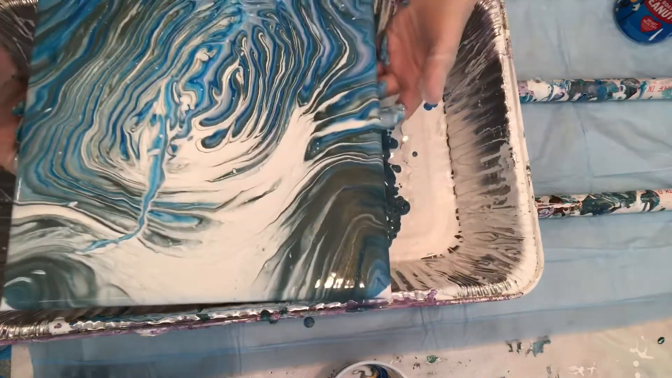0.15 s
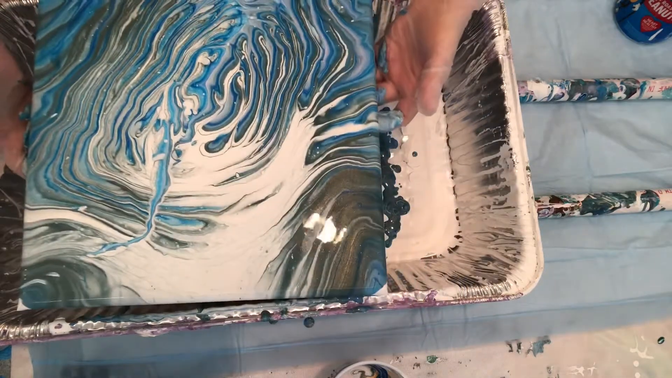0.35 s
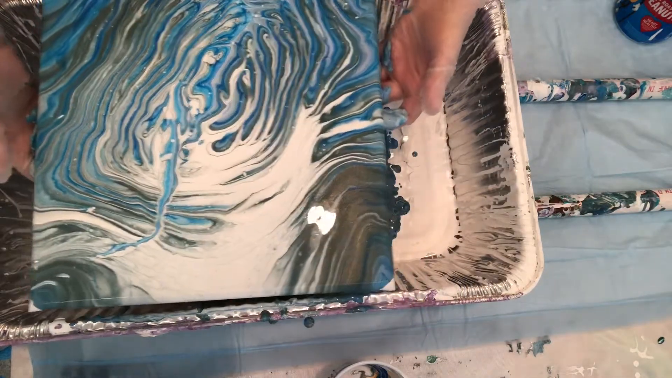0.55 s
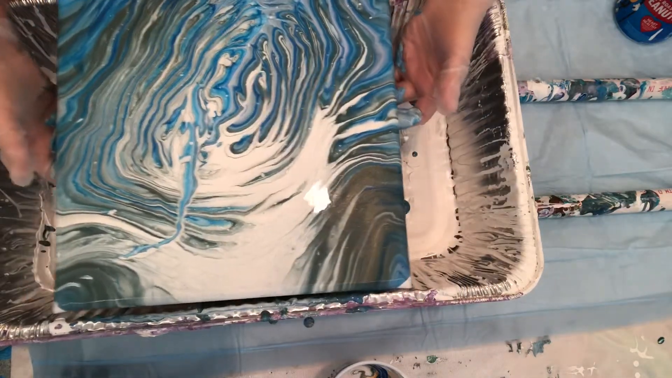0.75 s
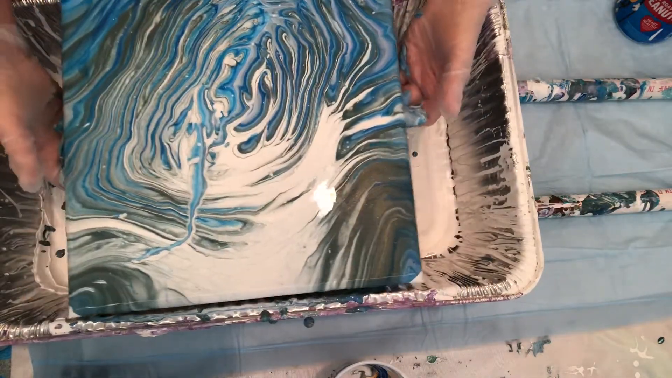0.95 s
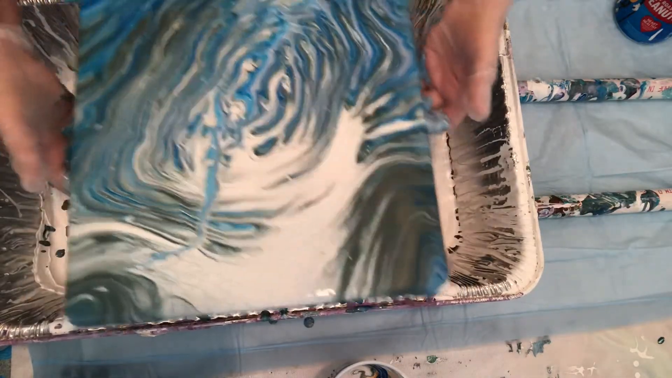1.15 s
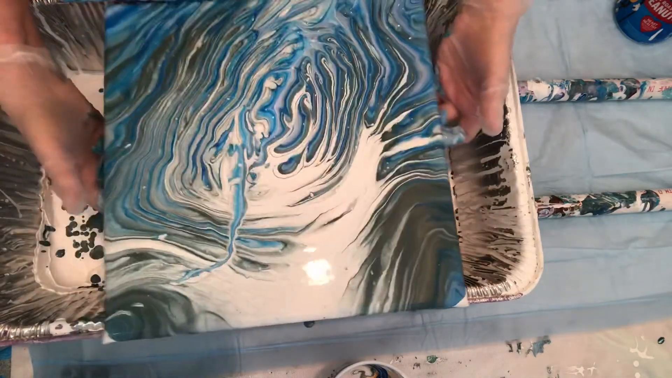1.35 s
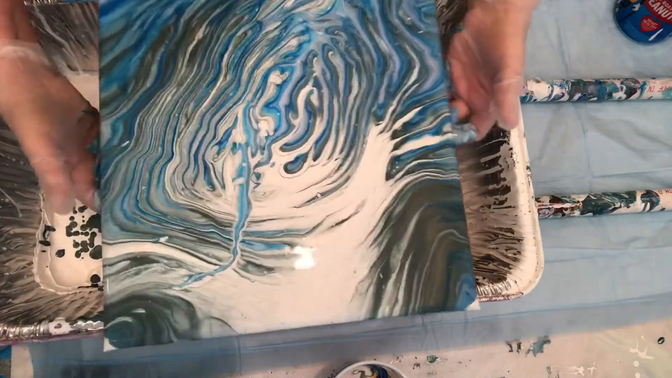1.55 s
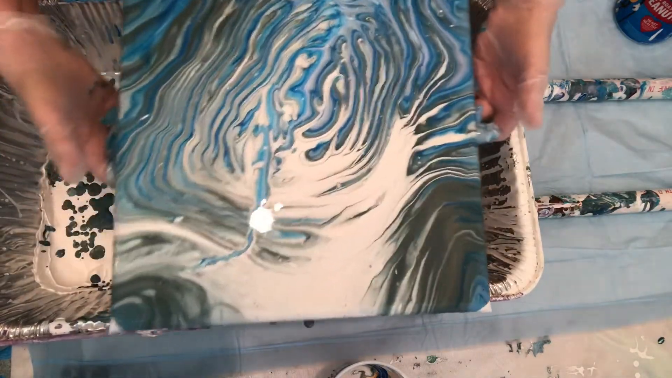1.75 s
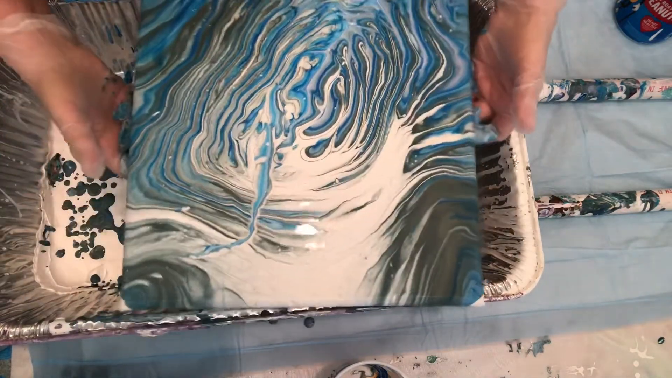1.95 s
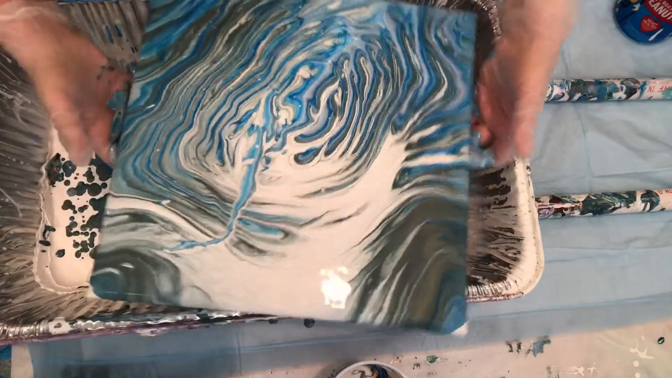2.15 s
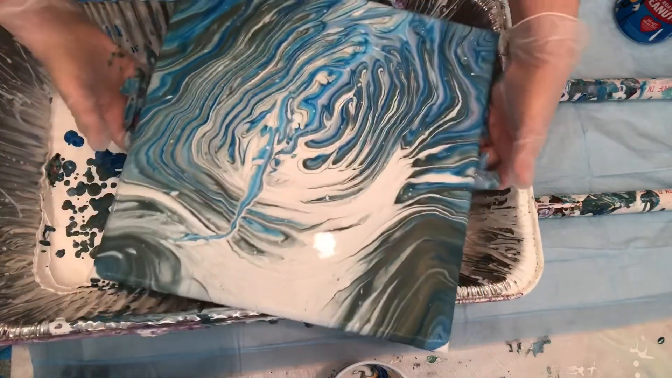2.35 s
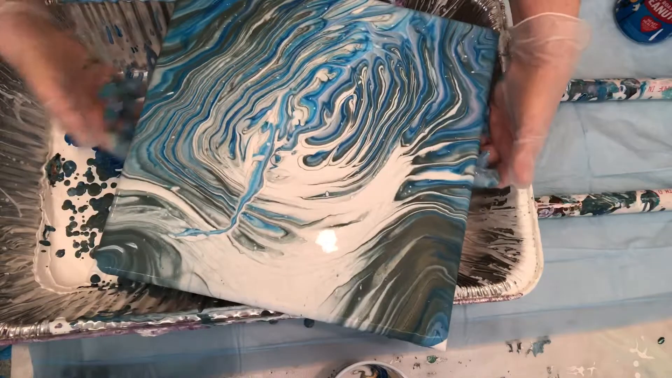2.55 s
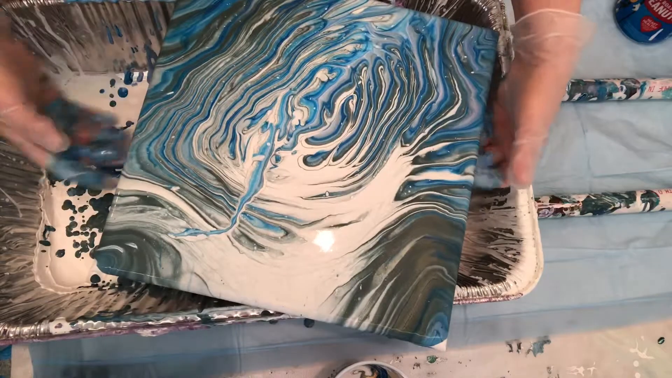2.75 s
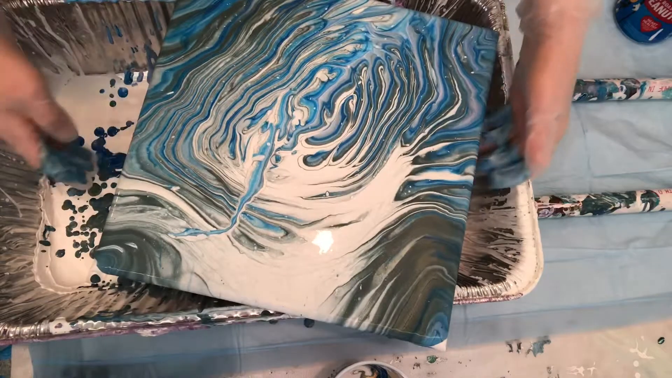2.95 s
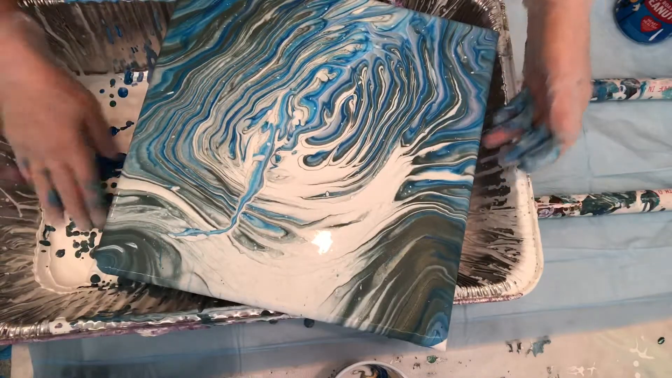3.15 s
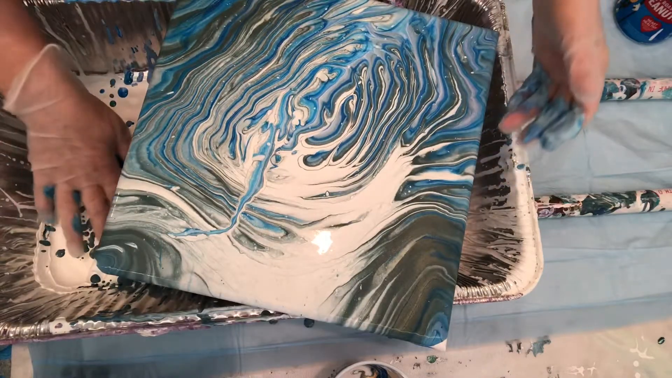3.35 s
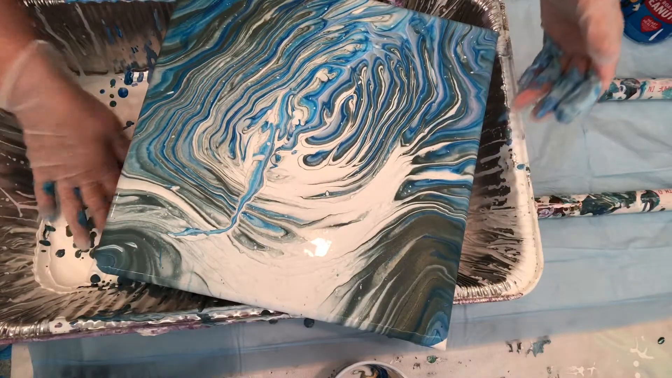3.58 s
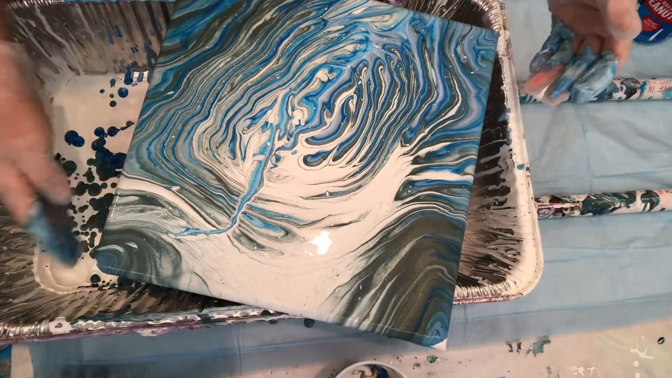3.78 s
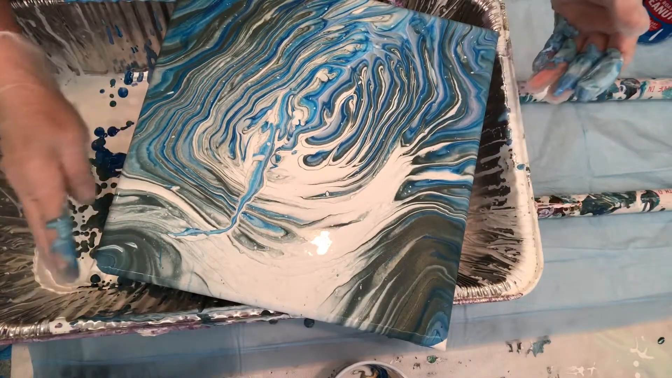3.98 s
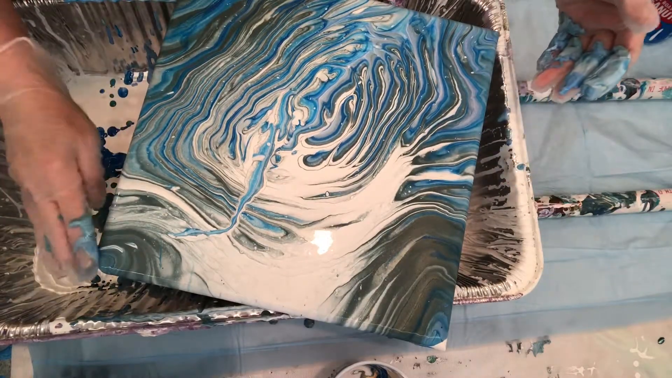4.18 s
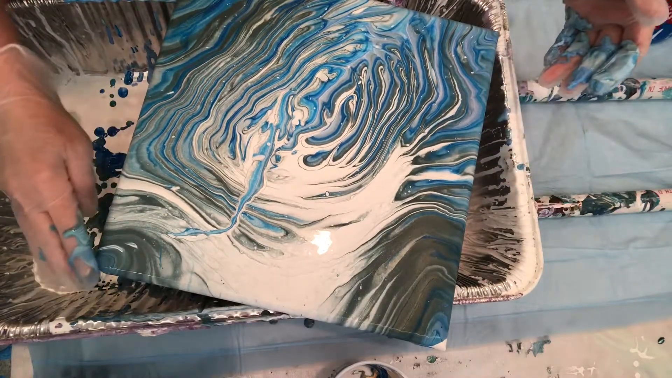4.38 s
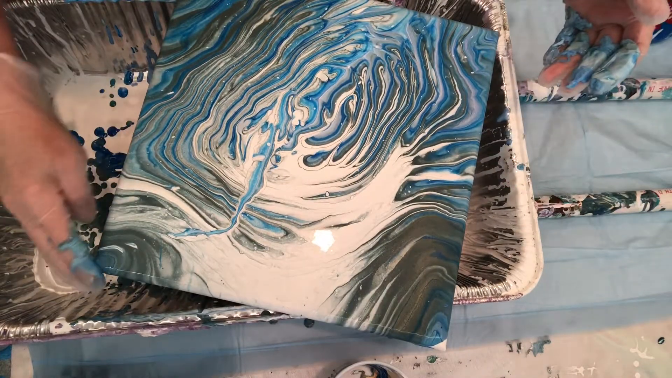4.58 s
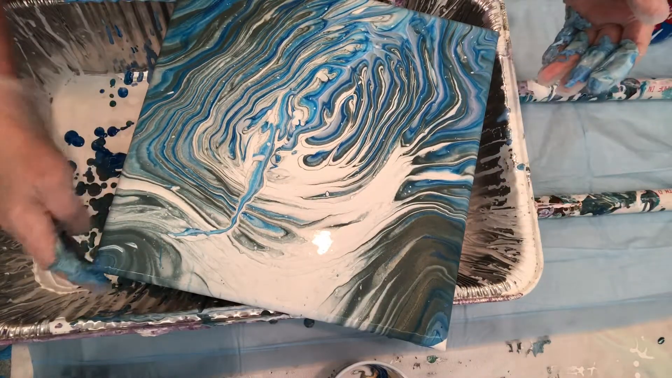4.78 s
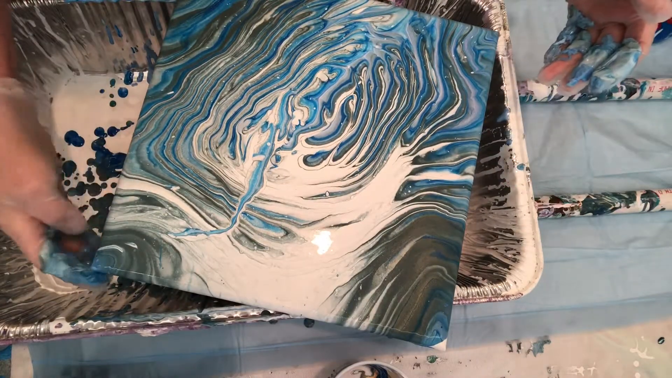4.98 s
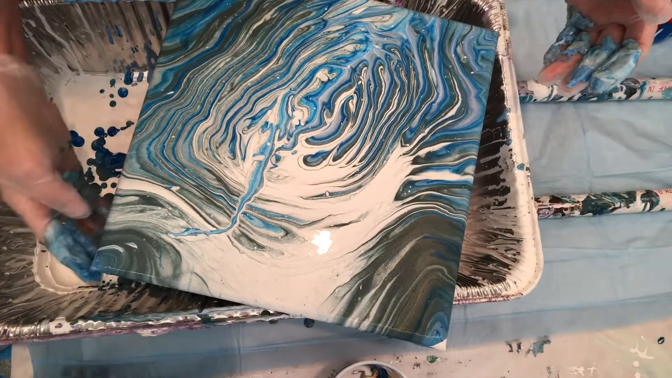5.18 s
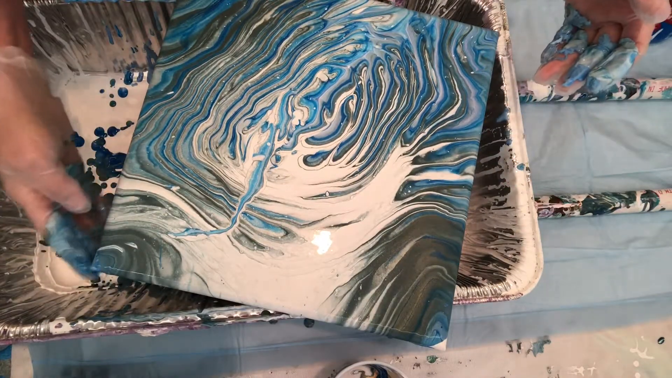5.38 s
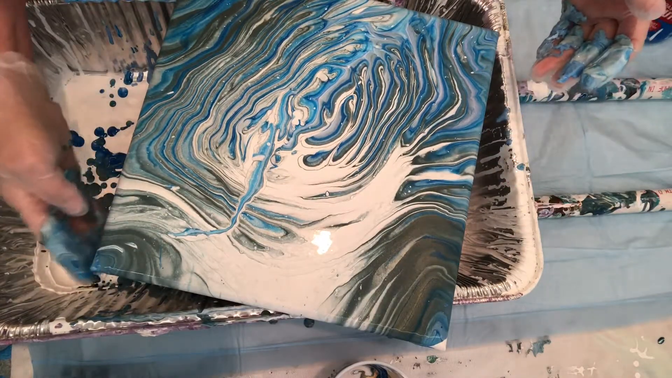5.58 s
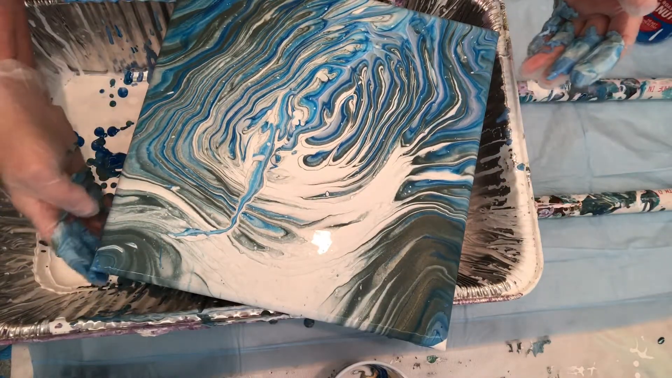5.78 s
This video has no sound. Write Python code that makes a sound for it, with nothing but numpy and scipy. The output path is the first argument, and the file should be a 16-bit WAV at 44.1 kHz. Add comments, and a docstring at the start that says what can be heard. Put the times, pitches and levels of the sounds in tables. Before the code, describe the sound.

A wooden-framed canvas bumps, drags and settles on a crackling foil tray, then gloves softly slide off and dab its edge.

```python
"""Over faint room tone, a wet stretched canvas knocks and drags on a foil tray as gloved hands tilt it.
Each landing clatters the tray, drums the cloth and thumps the wooden frame; the foil snaps under the load.
The canvas is set down and the tray's rim creaks in stick-slip steps. The gloves slide off, squeaking,
and a finger dabs along the wet edge. The small room adds a short tail."""
import sys
import numpy as np
from scipy import signal
from scipy.io import wavfile
from scipy.ndimage import uniform_filter1d

SR = 44100
rng = np.random.default_rng(int(sys.argv[2]) if len(sys.argv) > 2 else 0)


def unload_audio(sound):
    """Save the sound as a 16-bit wav file, at the path given as the first command line argument."""
    columns = np.transpose(np.atleast_2d(sound))
    # keep every value between -1 and 1, then stretch to whole-number steps
    steps = np.round(np.clip(columns, -1, 1) * 32767)
    wavfile.write(sys.argv[1], SR, steps.astype(np.int16))


N = 257103
TIME_S = np.arange(N) / SR
RING_S = TIME_S[:SR // 3]  # time axis of one blow


def gain_of(db):
    """Decibels to amplitude."""
    return 10 ** (np.asarray(db) / 20)


def unit_rms(x):
    """Scales to rms 1."""
    return x / np.sqrt(np.mean(x ** 2) + 1e-20)


def unit_blow(x, size=441):
    """Scales a blow to the energy of size samples at rms 1."""
    return x * np.sqrt(size / (np.sum(x ** 2) + 1e-20))


def curve_at(points, hz):
    """Interpolates (freq_hz, value) points over log frequency."""
    freq_hz, value = np.transpose(points)
    return np.interp(np.log(hz + 1), np.log(freq_hz + 1), value)


def add(mix, start_s, sound):
    """Mixes a sound in at start_s."""
    part = mix[max(round(start_s * SR), 0):][:len(sound)]
    part += sound[:len(part)]


def colour(x, spectrum, size=4096):
    """Minimum-phase filter; white noise keeps its level."""
    log_gain = np.log(gain_of(curve_at(spectrum, abs(np.fft.fftfreq(size, 1 / SR)))))
    response = np.exp(np.conj(signal.hilbert(log_gain)))
    kernel = np.fft.ifft(response).real[:size // 2]
    return signal.oaconvolve(x, kernel / np.linalg.norm(kernel))[:len(x)]


def dense_ring(t60_curve, size):
    """Noise in which each band decays at its own rate."""
    hz, t, bands = signal.stft(rng.choice([-1., 1.], size), SR, nperseg=256)
    decay = gain_of(-60 * t / curve_at(t60_curve, hz)[:, None])
    return signal.istft(bands * decay, SR, nperseg=256)[1][:size]


def cushioned(x, rise_s):
    """Gradual onset of a soft contact."""
    return x * (1 - np.exp(-(RING_S / rise_s) ** 2))


def modes(table, rise_cycles, detune=0., uneven_db=0.):
    """Damped sines; pitch and strength vary with the spot struck."""
    hz, db, t60_s = np.transpose(table)[:, :, None]
    shift, strength = rng.standard_normal((2, len(table), 1))
    envelope = cushioned(np.exp(-np.log(1000) * RING_S / t60_s), rise_s=rise_cycles / hz)
    sines = np.sin(2 * np.pi * hz * (1 + detune * shift) * RING_S)
    return (gain_of(db + uneven_db * strength) * envelope * sines).sum(0)


def burst(decay_s):
    """A contact breaks up into tiny, fading clicks."""
    return rng.choice([-1., 1.], len(RING_S)) * np.exp(-RING_S / decay_s)


def resonate(x, table):
    """Parallel resonances, each applied twice for steep sides."""
    out = np.zeros(len(x))
    for hz, width_hz, db in table:
        b, a = signal.iirpeak(hz, hz / width_hz, fs=SR)
        out += gain_of(db) * signal.lfilter(b, a, signal.lfilter(b, a, x))
    return out


def room_tone(air_db=-67.5, waver=0.54):
    """Still air with a low, wavering hum."""
    # air spectrum: freq_hz, density_db
    air_spectrum = [(15, -54), (25, -37), (43, -12), (59, -11), (148, -7.5), (173, -13.5), (253, -13),
                    (297, -11.5), (433, -16.5), (469, -11), (666, -22.5), (804, -21), (2300, -32),
                    (3630, -29.5), (15500, -42.5)]
    # hum partials: pitch_hz, level_db
    partials = [(72.5, -73.5), (114, -76.5), (145, -78.5), (272, -85)]
    hum = np.zeros(N)
    for hz, db in partials:
        drift = np.interp(TIME_S, np.linspace(0, TIME_S[-1], 50), rng.standard_normal(50))
        hum += gain_of(db) * np.sqrt(2) * (1 + waver * drift) * np.sin(2 * np.pi * hz * TIME_S + drift)
    return hum + gain_of(air_db) * unit_rms(colour(rng.standard_normal(N), air_spectrum))


def contact(clatter_db, crack_db):
    """Wood meets foil: a sharp crack and the tray's clatter."""
    # first contact on foil: freq_hz, density_db
    crack_spectrum = [(500, -39), (1800, 11.5), (2800, 3.5), (4000, 3), (5500, 0), (7500, -6), (9000, -17),
                      (15500, -17.5)]
    # tray's dense, short ring: freq_hz, density_db
    clatter_spectrum = [(60, -39), (200, -19), (450, -1.5), (620, -3.5), (850, -2.5), (1080, -9),
                        (1350, -5.5), (1700, -16.5), (2600, -19.5), (5000, -33), (16000, -50)]
    crack = colour(unit_blow(cushioned(burst(decay_s=0.0058), rise_s=0.0002)), crack_spectrum)
    clatter = colour(unit_blow(cushioned(burst(decay_s=0.01), rise_s=0.00071)), clatter_spectrum)
    return gain_of(crack_db) * crack + gain_of(clatter_db) * clatter


def canvas(drum_db, thump_db, grip_s=0.053):
    """A blow thumps the frame and drums the cloth, whose ring the hands choke."""
    # stretched cloth: pitch_hz, level_db, t60_s
    cloth_modes = [(249.6, -11, 0.35), (284.6, -3.5, 0.63), (327, 9.5, 0.26), (355, -10.5, 0.51),
                   (414.3, -4.5, 0.41), (493, -13.5, 0.93), (527.4, -8.5, 0.4), (713, -5, 0.19),
                   (863, -16.5, 0.04), (900, -11, 0.37), (1210, -21, 0.16)]
    # wooden frame: pitch_hz, level_db, t60_s
    frame_modes = [(158.7, -2, 0.24), (179, -4.5, 0.18), (264.5, -3.5, 0.14)]
    grip = np.exp(-(RING_S / grip_s) ** 2)
    cloth = unit_blow(grip * modes(cloth_modes, rise_cycles=1.33, detune=0.0077, uneven_db=4.85))
    frame = unit_blow(modes(frame_modes, rise_cycles=0.64, detune=0.0048))
    return gain_of(drum_db) * cloth + gain_of(thump_db) * frame


def knocks(strike_s=0.0058, rebound_s=0.018, heavy_db=-24):
    """The frame touches, strikes and rebounds; heavy landings also ring the work table."""
    # landings: start_s, clatter_db, drum_db, thump_db, crack_db, rebound_gain_db
    landings = [(0.0734, -49.5, -50, -47, -69, 4.5), (0.2428, -38, -26.5, -46, -45, -1),
                (1.1084, -41, -34, -38, -45, 0.5), (1.2806, -37, -34, -38, -51, -30),
                (2.0702, -39, -36.5, -37, -52, -1), (2.201, -26.5, -25, -31.5, -37.5, -3.5),
                (2.246, -35.5, -36, -43.5, -47.5, -4.5), (2.356, -40, -46, -63, -56.5, -24),
                (2.431, -45.5, -44, -48.5, -70, -15)]
    # work table under the tray: pitch_hz, level_db, t60_s
    table_modes = [(64.5, -11, 0.52), (118.7, 1.5, 0.25), (180, -3, 0.23), (506, -19, 0.27),
                   (799, 1, 0.062)]
    out = np.zeros(N)
    for start_s, clatter_db, drum_db, thump_db, crack_db, rebound_gain_db in landings:
        touch = contact(clatter_db - 6, crack_db - 12)
        add(out, start_s, touch + canvas(drum_db, thump_db))
        add(out, start_s + strike_s, contact(clatter_db, crack_db))
        add(out, start_s + rebound_s, contact(clatter_db + rebound_gain_db, crack_db + rebound_gain_db))
        table_ring = unit_blow(modes(table_modes, rise_cycles=1.66, detune=0.0023))
        table_db = -32 + 1.45 * (drum_db - heavy_db)
        add(out, start_s, gain_of(table_db) * table_ring)
    return out


def friction(catches_per_s, spread_db, smooth, foil_share, pressure_db=1.66):
    """Tiny catches over a smooth rub, under uneven pressure; part of it rings the ribbed foil."""
    # foil's close resonances: freq_hz, t60_s
    foil_decay = [(500, 0.023), (3000, 0.072), (14000, 0.028)]
    sizes = gain_of(spread_db * np.minimum(rng.exponential(1, N), 4)) * rng.choice([-1., 1.], N)
    catches = unit_rms(sizes * (rng.random(N) < catches_per_s / SR))
    rub = catches + smooth * rng.standard_normal(N)
    pressure = unit_rms(uniform_filter1d(rng.standard_normal(N), size=400))
    rub *= gain_of(pressure_db * pressure)
    ring = dense_ring(foil_decay, size=4096)
    foil = signal.oaconvolve(rub, ring / np.linalg.norm(ring))[:N]
    return unit_rms(rub + foil_share * foil)


def drag(attack_s=0.017, release_s=0.016, dig_in_db=6):
    """Wood catches on ribbed foil: the canvas rumbles, and the scratch grows as the wood digs in."""
    # frame drags: start_s, length_s, rumble_db, final_scratch_db
    drags = [(0.08, .12, -60, -81), (0.276, 0.23, -60, -64), (0.51, 0.37, -56, -59),
             (.93, 0.065, -58.5, -72), (0.983, 0.084, -48.5, -58), (1.14, 0.19, -53, -59),
             (1.317, 0.17, -55.5, -84), (2.104, 0.084, -51, -61)]
    # canvas rumble: freq_hz, density_db
    rumble_spectrum = [(40, -41), (90, -28), (160, 6.5), (240, 1.5), (295, 12), (380, 3), (650, -3),
                       (900, 4), (1100, -3), (1700, -10.5), (2100, -14.5), (2600, -15.5), (6000, -55.5)]
    # foil scratch: freq_hz, density_db
    scratch_spectrum = [(800, -33), (1750, -6.5), (2100, 14), (2500, 6), (3100, 4), (3550, 6.5),
                        (4100, 0.5), (6000, -2.5), (8500, -11.5), (15500, -17)]
    rumble, scratch = np.zeros((2, N))
    for start_s, length_s, rumble_db, final_scratch_db in drags:
        t = TIME_S - start_s
        push = np.clip(t / attack_s, 0, 1) * np.exp(-np.maximum(t - length_s, 0) / release_s)
        rumble += push * gain_of(rumble_db)
        scratch += push * gain_of(final_scratch_db - dig_in_db * np.clip(1 - t / length_s, 0, 1))
    rub = friction(catches_per_s=900, spread_db=0.0, smooth=0.68, foil_share=0.39)
    rumble *= unit_rms(colour(rub, rumble_spectrum))
    scratch *= unit_rms(colour(rub, scratch_spectrum))
    return rumble + scratch


def snaps(ring_s=0.00033, ring_gain_db=-9, fizz_gain_db=-7):
    """Foil facets flip with a brief ring and a bright fizz."""
    # foil buckles: start_s, level_db, pitch_hz
    buckles = [(0.269, -59, 11400), (0.305, -57, 7200), (.498, -54, 3130), (.7497, -38, 5130),
               (0.92, -66, 11100), (1.164, -61, 7700), (1.196, -59, 6540), (1.226, -58.5, 6140),
               (1.255, -57, 7850), (1.2964, -41.5, 5530)]
    # fizz: freq_hz, density_db
    fizz_spectrum = [(1000, -3), (3500, -4), (6000, 7), (8500, -9), (12000, -1.5), (15500, 0.0)]
    out = np.zeros(N)
    for start_s, db, hz in buckles:
        ring = gain_of(ring_gain_db) * unit_blow(np.sin(2 * np.pi * hz * RING_S) * np.exp(-RING_S / ring_s))
        fizz = gain_of(fizz_gain_db) * unit_blow(colour(burst(decay_s=0.0038), fizz_spectrum))
        add(out, start_s, gain_of(db) * (ring + fizz))
    return out


def taps():
    """Light single contacts of frame on tray."""
    # taps: start_s, clatter_db, drum_db
    touches = [(0.312, -43, -70), (.360, -47, -74), (.625, -52.5, -62), (.765, -48, -59), (.843, -52, -61),
               (.867, -49.5, -53), (1.162, -48.5, -45.5), (1.224, -50, -69), (1.375, -45.5, -52),
               (1.412, -42, -56.5), (1.531, -55.5, -62), (1.609, -59, -82), (1.647, -62.5, -76),
               (1.726, -62, -84), (3.381, -56, -57.5), (3.422, -64, -51), (4.647, -63, -63)]
    out = np.zeros(N)
    for start_s, clatter_db, drum_db in touches:
        tray = contact(clatter_db, crack_db=clatter_db - 17)
        add(out, start_s, tray + canvas(drum_db, thump_db=drum_db - 1))
    return out


def slip(tick_gain_db=-2.5):
    """One stick-slip step ticks and rings the rim."""
    # rim resonances: pitch_hz, width_hz, gain_db
    rim = [(2260, 130, 8.5), (2870, 190, 4.5), (5500, 650, 1), (6400, 1700, -9), (7720, 490, 2),
           (7500, 170, -5)]
    # tick: freq_hz, density_db
    tick_spectrum = [(1000, -3), (7500, 6), (8600, -1), (10200, 2), (15500, -11)]
    step = cushioned(burst(decay_s=0.0037), rise_s=0.0015)
    tick = unit_blow(colour(step, tick_spectrum))
    return unit_blow(resonate(step, rim)) + gain_of(tick_gain_db) * tick


def creak(start_s=2.345, count=10, gap_s=0.062, gap_ratio=0.922, first_db=-64, fade_db=-9):
    """The rim settles in slips that quicken and fade."""
    stutter_until_s, stutter_lead_s = 2.49, 0.009
    out, at_s = np.zeros(N), start_s
    for k in range(count):
        db = first_db + fade_db * (k / (count - 1)) ** 2.9
        add(out, at_s, gain_of(db) * slip())
        if at_s < stutter_until_s:  # fresh load: a smaller slip leads the step
            add(out, at_s - stutter_lead_s, gain_of(db - 3) * slip())
        at_s += gap_s * gap_ratio ** k
    return out


def swell(middle_s, db, length_s):
    """Smooth rise and fall of a hand stroke."""
    return gain_of(db) * np.exp(-(2 * (TIME_S - middle_s) / length_s) ** 2)


def glove_slide():
    """Gloves swish off the tray; the rubber stutters on the foil and squeaks."""
    # swishes: middle_s, level_db, length_s
    strokes = [(2.405, -67, 0.29), (2.65, -69, 0.18), (2.862, -64, 0.16), (3.036, -64.5, 0.18),
               (3.172, -58, 0.12), (3.282, -61.5, 0.16), (3.55, -67, 0.26), (3.668, -66, .13)]
    # glove hiss: freq_hz, density_db
    hiss_spectrum = [(200, 3), (500, -2), (800, 6.5), (1400, 0.5), (2000, 0.5), (2700, -0.5), (4300, -2.5),
                     (6300, -4), (8300, -8.5), (11000, -11.5), (15500, -15)]
    # rubber catches: middle_s, level_db, length_s
    catches = [(2.618, -63.5, 0.038), (3.098, -64.5, .03), (3.155, -64.5, 0.053), (3.209, -57, 0.044),
               (3.271, -55.5, 0.028), (3.308, -70, 0.026), (3.695, -67, 0.054)]
    # squeak resonances: pitch_hz, width_hz, gain_db
    squeak_bands = [(745, 68, -3), (970, 160, 2.5), (1107, 120, 2), (1150, 51, -8)]
    rub = friction(catches_per_s=2200, spread_db=2.5, smooth=1.9, foil_share=0.51)
    swishes = unit_rms(colour(rub, hiss_spectrum)) * sum(swell(*row) for row in strokes)
    squeaks = unit_rms(resonate(rub, squeak_bands)) * sum(swell(*row) for row in catches)
    return swishes + squeaks


def fingertip():
    """A finger dabs the wet edge; two rubs and one brief, soft tap sound faintly pitched."""
    # faint pitched finger sounds: middle_s, level_db, length_s, pitch_hz, width_hz
    pitched_touches = [(2.868, -73.5, 0.19, 5270, 450), (4.93, -77.5, 0.39, 1700, 740),
                       (5.064, -66, 0.037, 815, 150)]
    # dabs: middle_s, level_db, length_s
    dabs = [(4.394, -76.5, .04), (4.492, -71, 0.024), (4.589, -69.5, 0.034), (4.787, -65, 0.065),
            (5.059, -70, 0.21), (5.23, -63, 0.026), (5.325, -69.5, 0.034), (5.413, -68, 0.027),
            (5.488, -63.5, .022), (5.596, -57, 0.053), (5.75, -62.5, 0.034), (5.82, -67.5, 0.027)]
    # rustle on wet cloth: freq_hz, density_db
    rustle_spectrum = [(300, -20), (600, 2), (850, 4.5), (1100, -11), (1500, -7), (1700, 1), (1950, -3),
                       (2700, 3), (3300, 2), (4500, -6.5), (8000, -12), (15500, -29)]
    rub = friction(catches_per_s=1300, spread_db=0.5, smooth=1.0, foil_share=0.23)
    out = unit_rms(colour(rub, rustle_spectrum)) * sum(swell(*row) for row in dabs)
    for middle_s, db, length_s, hz, width_hz in pitched_touches:
        out += swell(middle_s, db, length_s) * unit_rms(resonate(rub, [(hz, width_hz, 0)]))
    return out


def room(x, wet_db=-10, delay_s=0.004):
    """The walls return a short diffuse tail."""
    # room decay: freq_hz, t60_s
    wall_decay = [(100, 0.21), (400, 0.61), (1500, 0.51), (5000, 0.47), (14000, 0.33)]
    tail = np.concatenate([np.zeros(round(delay_s * SR)), dense_ring(wall_decay, size=SR // 2)])
    return x + gain_of(wet_db) * signal.oaconvolve(x, tail / np.linalg.norm(tail))[:N]


def scene():
    """Canvas, tray and hands in the room, mono."""
    handling = knocks() + taps() + snaps() + creak() + drag() + glove_slide() + fingertip()
    return (room(handling) + room_tone())[None]


def record(dry):
    """Steep low-pass band limit."""
    cutoff_hz = 15900
    lowpass = signal.firwin(511, cutoff_hz, window=("kaiser", 9), fs=SR)
    return signal.oaconvolve(dry, lowpass[None], "same")


dry = scene()
out = record(dry)
unload_audio(out)
```